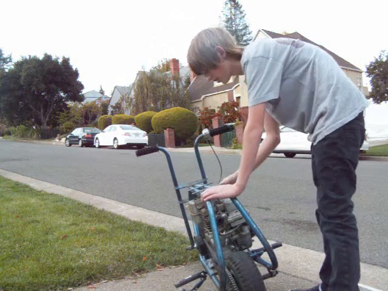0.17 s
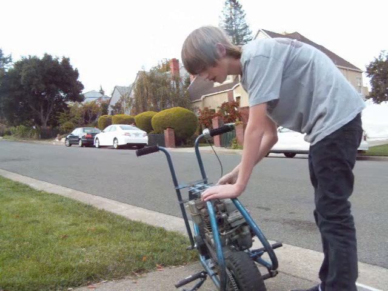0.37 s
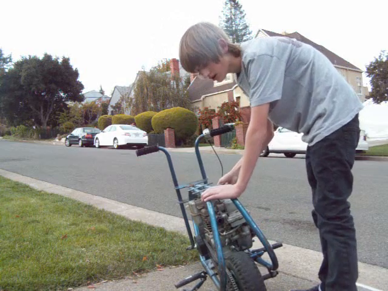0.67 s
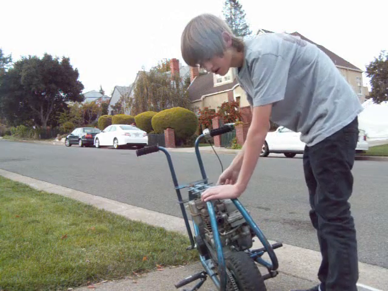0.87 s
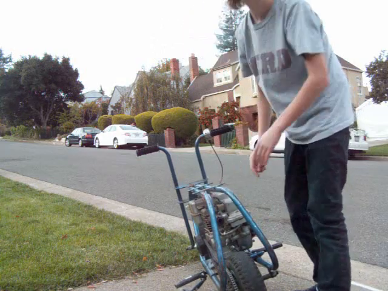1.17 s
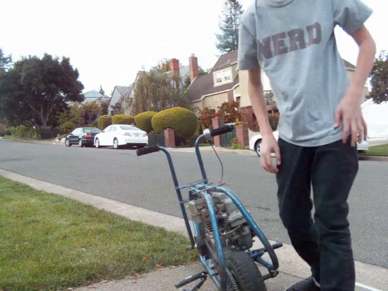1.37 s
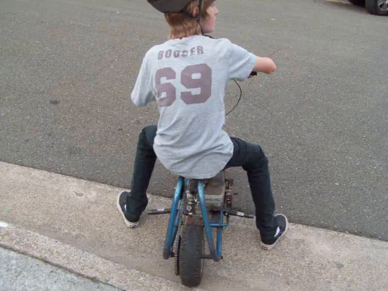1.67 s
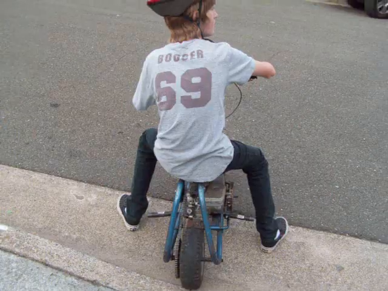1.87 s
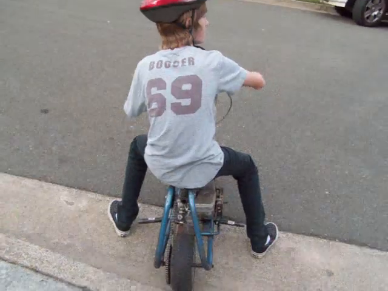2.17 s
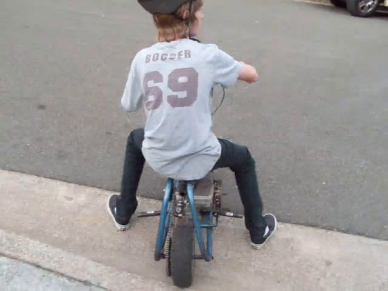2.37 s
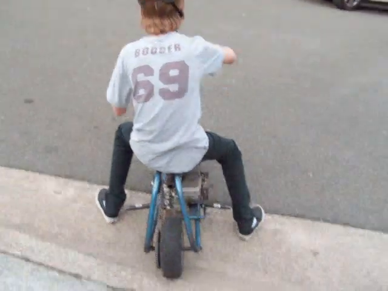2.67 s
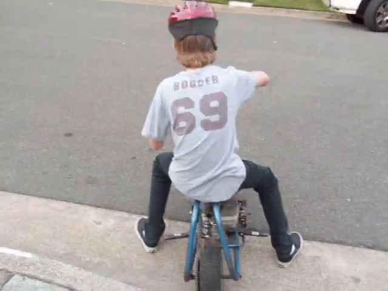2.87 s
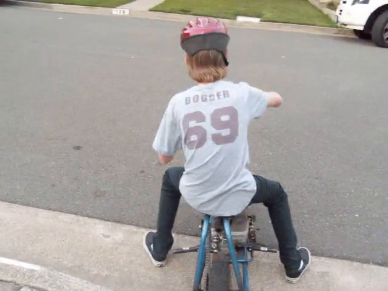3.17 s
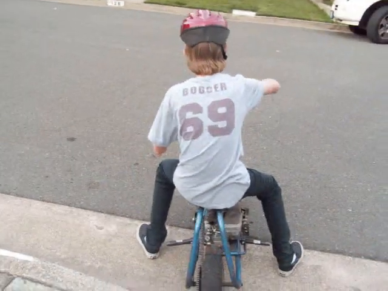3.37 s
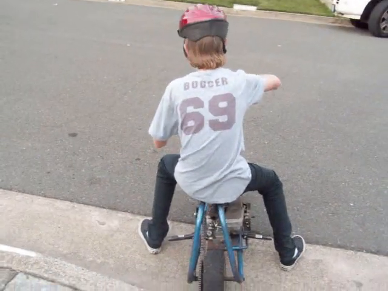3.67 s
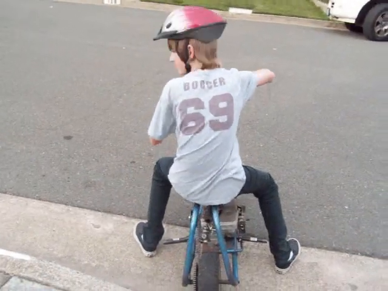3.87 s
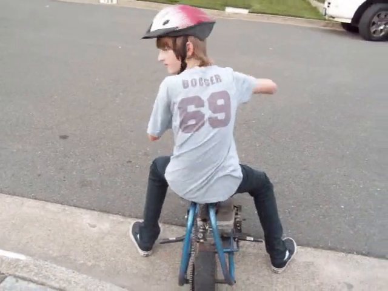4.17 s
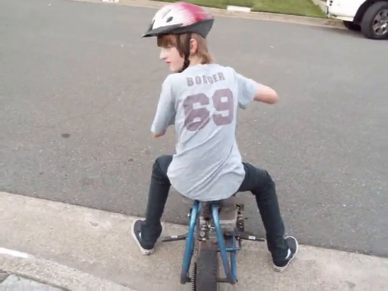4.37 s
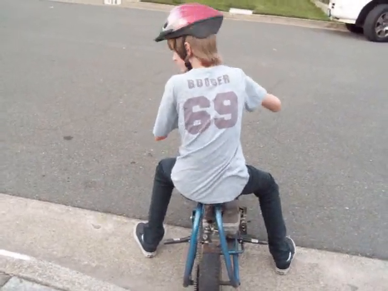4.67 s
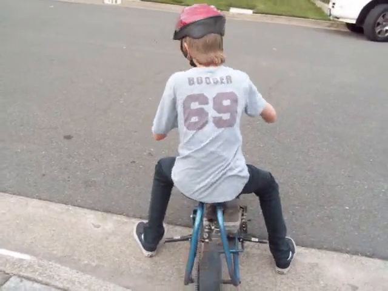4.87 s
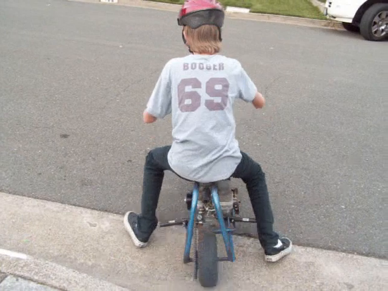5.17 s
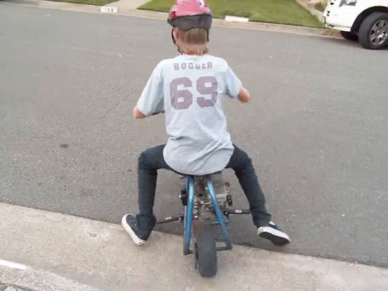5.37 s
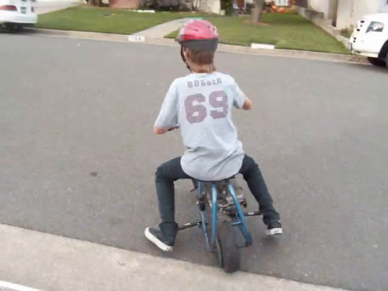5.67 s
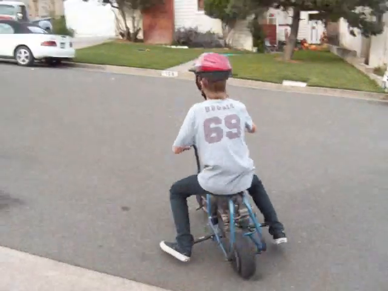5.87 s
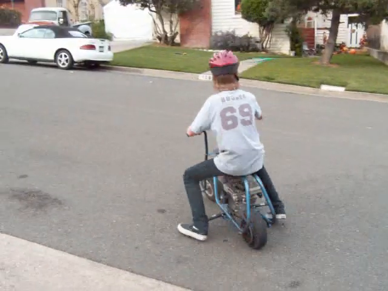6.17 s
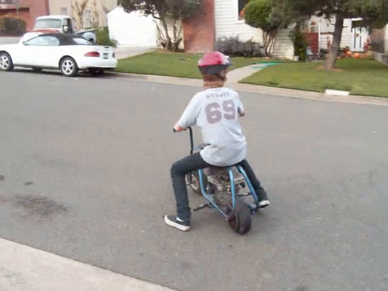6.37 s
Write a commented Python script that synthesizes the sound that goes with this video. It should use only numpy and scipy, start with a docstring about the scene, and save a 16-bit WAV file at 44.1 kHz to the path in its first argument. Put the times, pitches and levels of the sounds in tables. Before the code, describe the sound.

A small single-cylinder engine sputters down and stalls with metallic ticks, then after a silent gap idles, revs against its clutch and rides off.

```python
"""Open street between house fronts: a mini bike with a small single-cylinder four-stroke, one small microphone.
It is heard from the side as it runs down and stalls, after a silent gap from behind at idle and revving against
the clutch, then riding off. Direct sound comes first, the echoes from 8 ms on.
Each firing is a hissing blow-down of shaped noise, a pipe pop of decaying waves with a crack, and a valve clatter;
filtered noise makes the running gear, the clutch drum and the frame hum, and short ticks make the loose metal."""
import sys
import numpy as np
from scipy import signal
from scipy.fft import rfft, irfft, next_fast_len
from scipy.io import wavfile

SR = 44100
rng = np.random.default_rng(int(sys.argv[2]) if len(sys.argv) > 2 else 0)


def inscribe(sig):
    """Save sig as 16-bit PCM at rate SR to the path in sys.argv[1].

    A 1-D sig is mono; a 2-D sig holds one channel per row.
    Samples are clipped to [-1, 1] before scaling.
    """
    pcm = np.round(np.clip(np.atleast_2d(sig).T, -1, 1) * 32767)
    wavfile.write(sys.argv[1], SR, pcm.astype(np.int16))


N = 287973
T = np.arange(N) / SR


def amp(db):
    """Decibels to gain."""
    return 10 ** (np.asarray(db) / 20)


def rms_one(x):
    """Scale to rms 1."""
    return x / np.sqrt(np.mean(x ** 2) + 1e-20)


def add(track, start_s, shape):
    """Mix a short shape into a track."""
    i = round(start_s * SR)
    shape = shape[max(-i, 0):max(N - i, 0)]
    track[max(i, 0):max(i, 0) + len(shape)] += shape


def grainy(grain_db, rate_hz):
    """White noise whose level flickers fast, as turbulence and small contacts do; rms 1."""
    r = np.exp(-2 * np.pi * rate_hz / SR)
    flicker = rms_one(signal.lfilter([1], [1, -2 * r, r * r], rng.standard_normal(N)))
    return rms_one(rng.standard_normal(N) * amp(grain_db * flicker))


def ticks(per_s, spread_db):
    """Loose parts touch at random: sparse clicks of uneven size; rms 1."""
    sizes = amp(spread_db * np.minimum(rng.exponential(1, N), 4))
    signs = rng.choice([-1, 1], N)
    return rms_one(sizes * signs * (rng.random(N) < per_s / SR))


def resonate(x, hz, width_hz):
    """One resonance with gain 1 on top."""
    r = np.exp(-np.pi * width_hz / SR)
    feedback = [1, -2 * r * np.cos(2 * np.pi * hz / SR), r * r]
    return signal.lfilter(np.array([1, 0, -1]) * (1 - r * r) / 2, feedback, x)


def singing(hz, width_hz):
    """Noise twice through a narrow mode, its deepest fades evened out: a wavering tone of rms 1."""
    tone = resonate(resonate(rng.standard_normal(N), hz, width_hz), hz, width_hz)
    envelope = np.abs(signal.hilbert(rms_one(tone), next_fast_len(N))[:N])
    return rms_one(tone / (envelope + 0.15))


def body(x, spectrum, modes=(), size=8192):
    """Causal (minimum-phase) filter of unit power gain from a spectrum and resonances."""
    hz = np.maximum(np.arange(size // 2 + 1) * SR / size, 1)
    points = np.array(spectrum)
    gain = amp(np.interp(np.log(hz), np.log(points[:, 0]), points[:, 1]))
    for centre_hz, width_hz, db in modes:
        gain = gain * (1 + (amp(db) - 1) / np.sqrt(1 + (2 * (hz - centre_hz) / width_hz) ** 2))
    # folding the cepstrum onto positive time gives the minimum-phase response
    cepstrum = irfft(np.log(gain + 1e-5))
    cepstrum[1:size // 2] *= 2
    cepstrum[size // 2 + 1:] = 0
    response = irfft(np.exp(rfft(cepstrum)))
    return signal.fftconvolve(x, response / np.sqrt(np.sum(response ** 2)))[:N]


# Where the microphone hears the bike from: side, behind, riding off. Each row: start in seconds, end in seconds.
STANCES = [(0, 1.789), (2.087, 4.81), (4.81, 6.6)]


def during(stance):
    """True at the samples of one stance."""
    start, end = STANCES[stance]
    return (T >= start) & (T < end)


def fade_db(s):
    """The rise out of the silent gap: from 16.5 dB down, over 0.26 s."""
    since = s - STANCES[1][0]
    return -16.5 * np.clip(1 - since / 0.26, 0, 1) * (since >= 0)


# Crank speed, one curve for the run-down and one from the restart on; the first row of each is a firing.
# Each row: time in seconds, firings per second.
SPEED = [
    [(0.0097, 17.951), (0.5, 17.008), (0.82, 14.767), (1.16, 11.048), (1.6129, 6.376)],
    [(2.0956, 13.478), (2.7, 12.119), (3.32, 12.989), (3.4, 14.317), (3.48, 12.326), (3.56, 15.78),
     (3.82, 19.322), (4.54, 17.073), (4.78, 16.933), (4.88, 21.613), (5.14, 23.216), (6.14, 23.145),
     (6.5189, 21.691)],
]


def speed():
    """Firings per second at every sample."""
    return np.interp(T, *np.transpose(np.concatenate(SPEED)))


# House fronts: return of the low part of the pops in dB, per stance; the echoes fall 60 dB in the T60.
STREET_DB, STREET_T60_S = [-25.5, -16.5, -7], 0.2


def street(pops):
    """House fronts return a short, dull cloud of echoes, the same for every pop."""
    t = np.arange(round(.2 * SR)) / SR
    cloud = rng.standard_normal(len(t)) * amp(-60 * t / STREET_T60_S) * (t > .008)
    dull = signal.lfilter(*signal.butter(1, [150, 400], "band", fs=SR), pops)
    return signal.fftconvolve(dull, cloud / np.sqrt(np.sum(cloud ** 2)))[:N]


# Tube frame modes. Each row: frequency in Hz, width in Hz, level in dB.
FRAME_MODES = [(71, 15, -5), (293.5, 2.4, 4.5), (553.7, 7.5, 5.5)]
# The frame hums as the engine slows. Each row, one per mode: onset in seconds,
# level at the onset in dB relative to the mode's own, change in dB per second.
HUMS = [(1.1, -39, 13.5), (.9, -35.5, -18.5), (.9, -38.5, -8.5)]


def frame():
    """Low hums of the tube frame during the run-down, each a wavering narrow mode."""
    out = 0
    for (start, db, db_per_s), (hz, width_hz, mode_db) in zip(HUMS, FRAME_MODES):
        sets_in = np.clip((T - start) / 0.15, 0, 1) * (T < STANCES[0][1])
        level_db = mode_db + db + db_per_s * (T - start) * (sets_in > 0)
        out = out + sets_in * amp(level_db) * singing(hz, width_hz)
    return out


# Clutch drum modes. Each row: frequency in Hz, width in Hz, relative level in dB.
DRUM_MODES = [(2594, 10, -8), (4291, 10, 0), (6316, 10, -10), (6606, 22, -10)]
# Clutch shoes rub the drum lightly all the time: relative level in dB, per stance.
RUB_FLOOR_DB = [-35, -46.5, -48]
# The shoes bite and the drum squeals. Each row: peak time in seconds, relative level in dB,
# rise time constant in seconds, fall time constant in seconds.
SQUEALS = [(0.0, -16, .02, .12), (3.54, -23, 0.028, 0.17), (3.739, -26.5, 0.065, 0.037),
           (4.08, -20.5, 0.078, 0.038), (4.16, -17.5, 0.015, 0.087), (4.24, -19, .04, .07),
           (4.4, -26.5, .06, 0.18), ]


def drum():
    """Rubbing shoes make the narrow modes of the clutch drum sing."""
    modes = sum(amp(db) * singing(hz, width_hz) for hz, width_hz, db in DRUM_MODES)
    rub = sum(amp(db) * during(k) for k, db in enumerate(RUB_FLOOR_DB))
    for s, db, rise_s, fall_s in SQUEALS:
        rub = rub + amp(db) * np.exp(-abs(T - s) / np.where(T < s, rise_s, fall_s))
    return modes * rub * amp(-6.0 + fade_db(T))


# Loose metal knocks. Each row: start in seconds, relative level in dB, main frequency in Hz.
KNOCKS = [(1.3235, -4.5, 2600), (1.3803, -1.5, 3400), (1.442, -4, 3200), (1.463, -19, 3210),
          (1.5045, -3.5, 3660), (1.5745, -2.5, 3250), (1.6068, -8, 3950), (1.6512, -1, 3440),
          (1.7458, 1, 3500), (1.7564, -12.5, 3600), (1.7842, -5, 3600), (2.387, -4, 5460),
          (2.4342, 1.5, 2190), (2.514, -1, 1200)]


def knocks():
    """Loose metal: short noisy ticks, each a dying burst in a band about its own pitch."""
    out, t = np.zeros(N), np.arange(900) / SR
    for s, db, hz in KNOCKS:
        band = signal.butter(2, [hz / 1.7, hz * 1.25], "band", fs=SR)
        noise = rms_one(signal.lfilter(*band, rng.standard_normal(len(t))))
        add(out, s, amp(db - 2) * noise * np.exp(-t / 0.0018))
    return out


# How the engine works: under power at 0 s, throttle shut from 0.72, idling from 2.09, throttle opened against
# the clutch from 3.46, riding off from 4.85. Each row: time in seconds, pop level in dB, pop frequency in Hz,
# then relative levels in dB of low push, silencer bark, blow-down hiss, crack, valve clatter and running gear.
WORK = [(0.0, -16, 211, -38, -26, -23, -13, -18, -23), (0.64, -14, 210, -33, -25, -17.5, -28, -7.5, -21.5),
        (0.72, -20.5, 225, -16, -23, -19.5, -13, -17, -21.5),
        (1.05, -20, 211, -17.5, -23.5, -18, -15, -9.5, -20),
        (1.78, -18, 177.2, -23, -26.5, -19, -23.5, -25.5, -20.5),
        (2.09, -15, 198, -27.5, -14, -12.5, -12, -9.5, -23),
        (2.65, -18, 188, -23.5, -13, -10.5, -14, -15.5, -24.5),
        (3.2, -21, 183, -22.5, -14, -8, -17, -18.5, -23),
        (3.38, -26, 175, -20, -26, -10.5, -22, -20.5, -18),
        (3.46, -21.5, 176, -29, -9.5, -7, -8, -27, -24.5),
        (3.65, -21.5, 172, -25, -18, -7.5, -14, -23.5, -22.5),
        (3.85, -22, 196, -31.5, -19.5, -14, -14.5, -30.5, -27.5),
        (4.25, -19, 199, -42, -17, -15, -15, -22.5, -22),
        (4.57, -18, 201, -27, -13, -15.5, -11.5, -32, -22),
        (4.78, -26, 157, -28, -28, -4, -26, -34.5, -21.5), (4.85, -24, 165, -43, -19, -10, -9, -27, -29),
        (5.1, -23.5, 176, -33, -21, -13, -10, -26.5, -30.5),
        (5.3, -23, 179.3, -36, -21.5, -17, -10, -29.5, -33.5),
        (5.9, -22, 188, -33.5, -21.5, -15, -12, -44, -31), (6.53, -19.5, 197, -30, -21, -20, -8, -31, -30)]


def contacts(valve, lull):
    """Gear and valve parts touch: grainy noise and clicks, quieter in the lull, louder in the clatter."""
    work = np.array(WORK)
    gear = amp(np.interp(T, work[:, 0], work[:, -1]) + fade_db(T) - 1.0)
    touching = grainy(grain_db=2.0, rate_hz=84) + amp(-3.5) * ticks(per_s=900, spread_db=2.0)
    return (gear * np.clip(1 - lull, 0, 1) + valve) * touching


# Colour of the running gear, one list per stance. Each row: frequency in Hz, relative level in dB per Hz.
GEAR_COLOUR = [
    [(15, -46.5), (25, -23), (149, -7.5), (280, -9.5), (433, -13.5), (551, -10.5), (755, -14),
     (1010, -15.5), (1980, -9), (3900, 5), (4970, -2.5), (5480, -7), (6330, -20), (7320, -22), (8060, 3),
     (10500, -64.5), (17700, -120)],
    [(15, -57), (25, -35.5), (161, 3.5), (231, -5), (366, -6.5), (579, -5), (938, -4.5), (1140, -5),
     (1280, 2.5), (1940, -6), (2350, -4), (3720, 2), (6640, -20), (7500, -12.5), (8060, 5), (10500, -62),
     (17700, -120)],
    [(15, -49), (25, -21), (186, 1.5), (261, 0), (357, -5.5), (489, -11.5), (622, -5), (985, -12.5),
     (1640, -6.5), (2350, -13.5), (3220, 1), (5340, -16), (6330, -19.5), (7320, -18.5), (8060, -27.5),
     (10500, -53), (17700, -120)],
]
# Casing resonances that face the microphone, one list per stance.
# Each row: frequency in Hz, width in Hz, dB over the gear colour.
CASING = [
    [(545, 80, 7), (864, 27, 11), (1026, 92, 10.5), (1200, 52, 7), (1380, 23, 5.5), (1540, 58, 8),
     (1833, 36, 3), (5000, 1230, -20.5), (6060, 29, 15.5)],
    [(567, 17, 12), (620, 86, 6), (1261, 27, 7.5), (1880, 58, 13), (3150, 160, 3.5), (4580, 27, 6.5),
     (6160, 30, 15.5)],
    [(1277, 27, 11), (2200, 92, 6.5)],
]
# Treble of the gear, one row per stance. Each row: dB relative to the part below 5.1 kHz at 15 firings
# per second, dB more per firing per second.
TREBLE = [(1, 2.07), (-3, 2.5), (-5, -1)]


def running_gear(metal, stance):
    """Contacts ring through the casing; the treble rises or falls with crank speed."""
    rattle = body(metal, GEAR_COLOUR[stance], CASING[stance])
    low, high = (signal.sosfilt(signal.butter(8, 5100, side, fs=SR, output="sos"), rattle)
                 for side in ("low", "high"))
    at_15_db, db_per_speed = TREBLE[stance]
    treble = amp(at_15_db + db_per_speed * (speed() - 15))
    return low + high * treble * np.std(low) / np.std(high)


# Colour of the exhaust gas, one list per stance. Each row: frequency in Hz, relative level in dB per Hz.
GAS_COLOUR = [
    [(410, -54.5), (700, -23), (760, -30), (1000, 4), (1110, -10.5), (1520, -5), (2030, -22.5),
     (2290, -4.5), (3900, 4), (4410, 2.5), (4980, -13.5), (5870, -3.5), (8060, -24.5), (10500, -52),
     (17700, -120)],
    [(410, -43.5), (700, -2), (932, -13.5), (1030, -11.5), (1270, -5.5), (1620, -6), (1930, -6.5),
     (2460, -8.5), (3740, 1), (4060, -4), (6640, -6.5), (7660, -11), (8060, 3.5), (10500, -74),
     (17700, -120)],
    [(410, -34.5), (700, -13.5), (1080, -18), (1250, -14), (2180, -10.5), (2360, -15.5), (3110, -0.5),
     (3590, -1.5), (3980, -8), (5580, -14), (6710, -13.5), (7500, -20.5), (8060, -4.5), (10500, -67),
     (17700, -120)],
]


def exhaust_gas(jet, stance):
    """Turbulent gas hisses, coloured by the side that faces the microphone."""
    return body(jet, GAS_COLOUR[stance])


# Exhaust pipe, one row per stance. Each row: low push in Hz, lasting ring in Hz, ring width in Hz,
# ring level in dB, intake gulp in dB relative to the bark.
PIPE = [(104, 350, 60, -1, -14), (103, 180, 200, -18.5, -20.5), (115, 160, 15, -13, -4.5)]
# Pipe overtones that keep sounding under load: frequencies in Hz, width in Hz, relative levels in dB.
DRONE_HZ, DRONE_WIDTH_HZ, DRONE_DB = [254, 625, 710], 9, [6, 8, 10]


def pipe_ring(pops, stance):
    """Pops set the pipe ringing; in the last stance the hot pipe sustains its overtones between firings."""
    _, ring_hz, width_hz, ring_db, _ = PIPE[stance]
    ring = amp(ring_db) * resonate(pops, ring_hz, width_hz)
    if stance == len(STANCES) - 1:
        for hz, db in zip(DRONE_HZ, DRONE_DB):
            ring += amp(db - 7.0) * resonate(pops, hz, DRONE_WIDTH_HZ)
    return ring


# Firings that stand out or half fail. Each row: time in seconds, pop and bark in dB over their neighbours,
# gas in dB over its neighbours.
ODD_FIRINGS = [(.234, -3.5, -1.5), (.349, -0.5, 2.5), (.524, -1.5, -4), (2.248, -3.5, -2),
               (2.481, -7.5, -5), (2.964, 3.5, 1), (3.356, -12, -0.5), (3.426, 3.5, 5), (3.57, -1, -2.5),
               (3.632, 1, 3.5), (3.691, 2.5, 2.5), (3.746, -10, 0), (4.064, -13, -3), (4.228, -4, -5),
               (4.339, 0.5, -4), (4.688, -3.5, 1), (4.805, 0.5, 3.5), (4.856, -7.5, -0.5), (4.994, 4.5, 0),
               (5.169, -4.5, -3.5), (6.205, 1, 0.5), (6.249, -1.5, 2)]
# Scatter from firing to firing in dB, in order: pop, push, bark, hiss, crack, valve.
SCATTER_DB = [0.7, 1.3, 1.7, 1.2, 1.2, 3.2]
LONGEST_CYCLE_S = .15


def firings():
    """One row per firing, timed by the crank, each a little stronger or weaker; its cycle length and luck."""
    times = []
    for curve in SPEED:
        running = (T >= curve[0][0]) & (T < curve[-1][0] + .01)
        turns = np.cumsum(speed()[running]) / SR
        times += list(np.interp(np.arange(int(turns[-1]) + 1), turns, T[running]))
    s = np.array(times)
    work = np.array(WORK)
    rows = np.array([s] + [np.interp(s, work[:, 0], column) for column in work.T[1:8]]).T
    levels = [1, 3, 4, 5, 6, 7]  # every column but time and pop frequency
    rows[:, levels] += fade_db(s)[:, None] + SCATTER_DB * rng.standard_normal((len(rows), len(levels)))
    for odd_s, pop_db, gas_db in ODD_FIRINGS:
        row = rows[np.argmin(abs(s - odd_s))]
        row[[1, 4]] += pop_db
        row[[5, 6]] += gas_db
    cycle = np.minimum(np.diff(s, append=2 * s[-1] - s[-2]), LONGEST_CYCLE_S)
    return rows, cycle, rng.standard_normal(len(s))


def swell(length_s, rise_s, fall_s, sag_s=1):
    """Gas flow through a valve: quick rise, a sagging hold and an exponential fall."""
    t = np.arange(round((length_s + 6 * fall_s) * SR)) / SR
    return (1 - np.exp(-t / rise_s)) * np.exp(-t / sag_s - np.maximum(t - length_s, 0) / fall_s)


def wave(hz, cycles, glide=0):
    """A pressure puff ringing in the pipe: small crest, deep trough three quarters of a cycle in, dying swings."""
    turn = np.arange(round(6 * SR / hz)) * hz / SR
    phase = turn + glide * ((turn - 2 * cycles) ** 2 - (.75 - 2 * cycles) ** 2) / 2
    envelope = (turn / cycles) ** 2 * np.exp(2 - turn / cycles) / 4
    return np.sin(2 * np.pi * phase) * envelope


# Exhaust timing at the usual cycle, one row per stance. Each row: blow-down lead before the pop in ms,
# blow-down length in ms, crack decay in ms, pop envelope in cycles, bark frequency in Hz.
TIMING = [(12.6, 11, 2.5, 0.48, 470), (16.1, 16, 3.6, 0.49, 637), (10.7, 7.8, 2.64, 0.21, 646)]
# Cycle length at which the exhaust timing holds, in seconds, per stance.
USUAL_CYCLE_S = [.06, .075, .043]
# The blow-down hiss sets in this fast and fades this fast after its first spit, both in ms, per stance.
RISE_MS = [4.0, 1.53, 1]
SAG_MS = [68, 8.35, 9.5]
# The pop rises in pitch as the pipe empties: glide in cycles per cycle squared, per stance.
GLIDE = [0.33, 0.3, 0.05]
# Valve clatter, one row per stance. Each row: start as a share of the cycle, length as a share of the cycle.
VALVE = [(.22, 0.1), (0.19, 0.19), (0.17, .25)]
# The gear quietens by this share past the middle of each cycle, per stance.
LULL = [0.54, 0.33, .2]


def engine():
    """Pops as pressure waves; envelopes of gas hiss, valve clatter and the lull of the gear in each cycle."""
    pops, gas, valve, lull = np.zeros((4, N))
    for row, cycle, luck in zip(*firings()):
        s, pop_db, hz, push_db, bark_db, blow_db, crack_db, valve_db = row
        k = sum(s > end for _, end in STANCES)
        lead_ms, hold_ms, crack_ms, cycles, bark_hz = TIMING[k]
        push_hz, _, _, _, gulp_db = PIPE[k]
        # a slower crank opens the valve earlier and longer
        slower = (cycle / USUAL_CYCLE_S[k]) ** 0.8
        lead_s, hold_s = lead_ms * slower / 1000, hold_ms * slower / 1000

        # the trough of the pop falls just before the firing time
        add(pops, s - .92 / hz, amp(pop_db + 3.0) * wave(hz, cycles, GLIDE[k]))
        add(pops, s - 0.86 / push_hz, amp(push_db - 1.5) * wave(push_hz, 0.39, 0.76))
        add(pops, s - 1.82 / bark_hz, amp(bark_db + 2.0) * wave(bark_hz, 0.53))
        # the intake gulps half a cycle later
        add(pops, s + 0.52 * cycle, amp(bark_db + gulp_db + 2.0 * luck) * wave(800, 0.55))

        blow_down = swell(hold_s, RISE_MS[k] / 1000, 0.0028, SAG_MS[k] / 1000)
        add(gas, s - lead_s, amp(blow_db + 2.4) * blow_down)
        add(gas, s - .0021, amp(crack_db) * swell(0.0017, 0.000063, crack_ms / 1000))

        start, length = VALVE[k]
        add(valve, s + start * cycle, amp(valve_db - 6.5) * np.hanning(round(length * cycle * SR)))
        add(lull, s + 0.5 * cycle, LULL[k] * np.hanning(round(0.19 * cycle * SR)))
    return pops, gas, valve, lull


def scene():
    """The same machine, coloured by the side that faces the microphone in each stance."""
    pops, gas, valve, lull = engine()
    jet = gas * grainy(grain_db=3.0, rate_hz=1400)
    metal = contacts(valve, lull)
    echoes = street(pops)
    shared = frame() + drum() + knocks() + pops
    out = np.zeros(N)
    for k in range(len(STANCES)):
        heard = shared + amp(STREET_DB[k]) * echoes
        heard += running_gear(metal, k) + exhaust_gas(jet, k) + pipe_ring(pops, k)
        out += during(k) * heard
    return out[None]


def record(dry):
    """The small microphone loses the deepest bass; a soft overload rounds peaks, then 8.4 kHz cuts the top."""
    thin = signal.lfilter(*signal.butter(1, 50, "high", fs=SR), dry)
    rounded = 1.1 * np.tanh(thin / 1.1)
    cut = signal.sosfilt(signal.cheby2(16, 75, 8400, fs=SR, output="sos"), rounded)
    return np.clip(cut, -1, 1)


dry = scene()
out = record(dry)
inscribe(out)
```